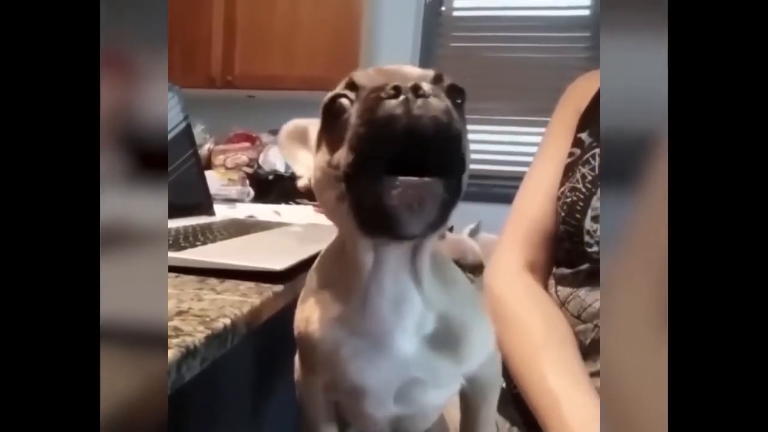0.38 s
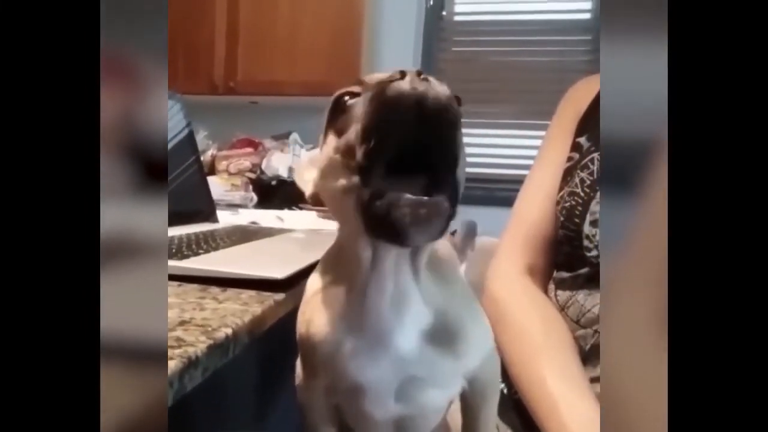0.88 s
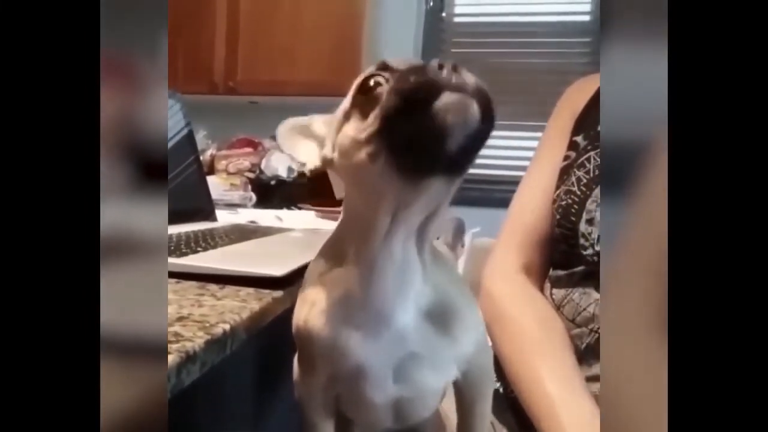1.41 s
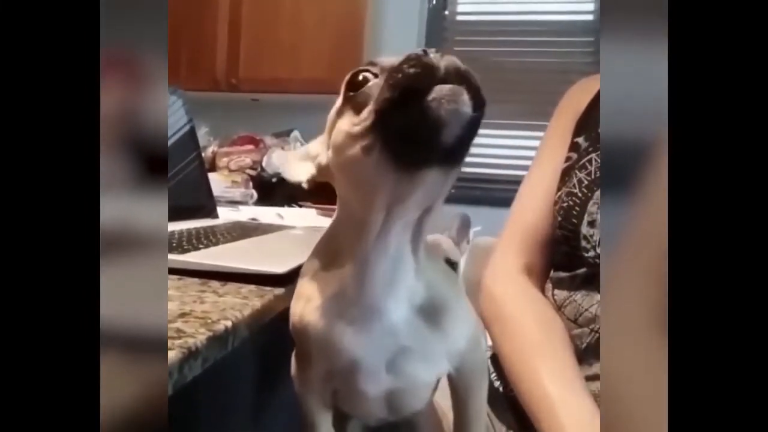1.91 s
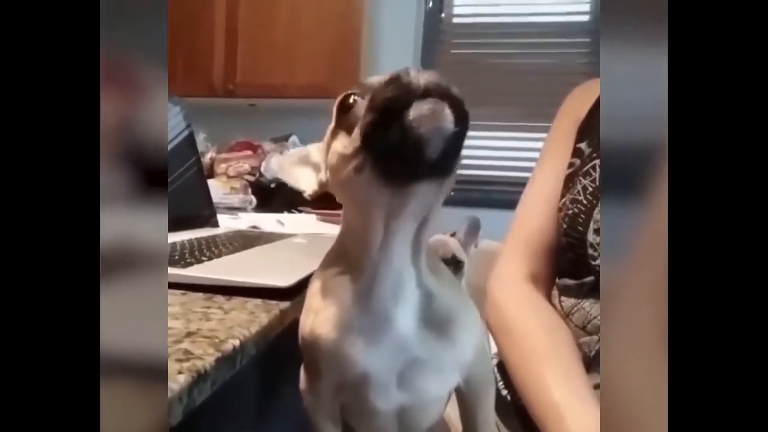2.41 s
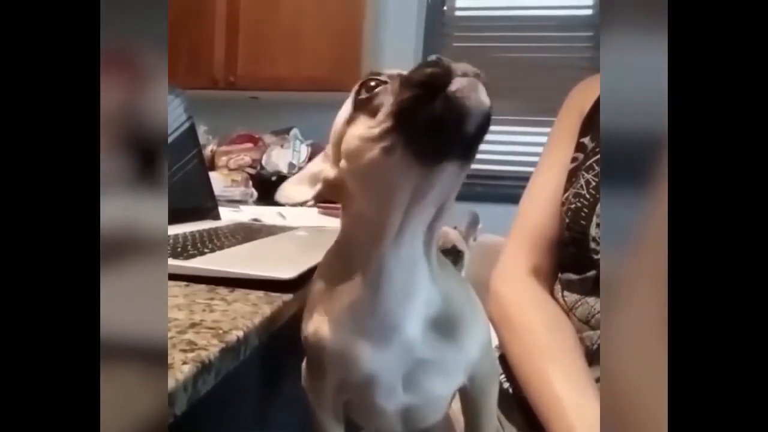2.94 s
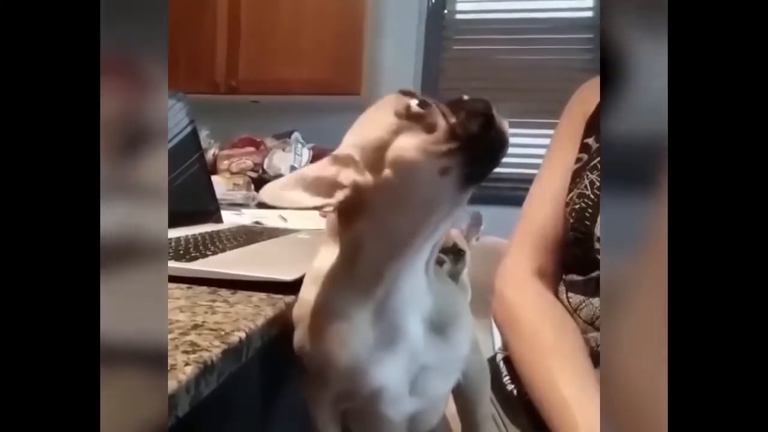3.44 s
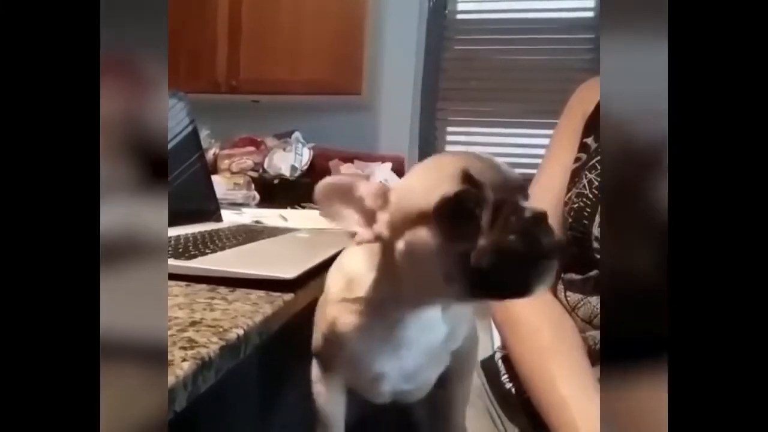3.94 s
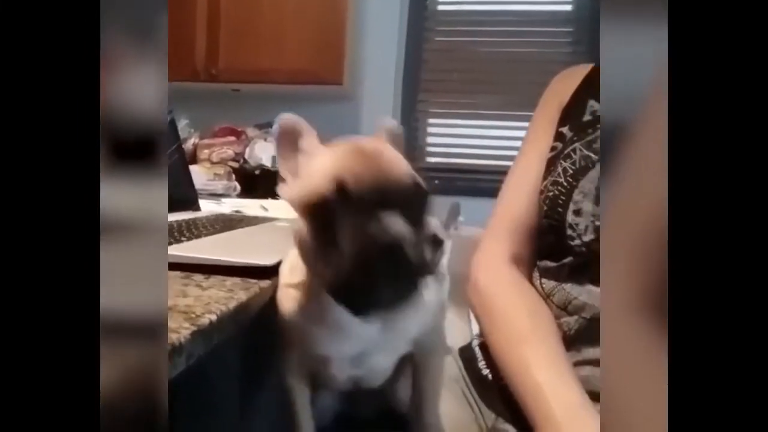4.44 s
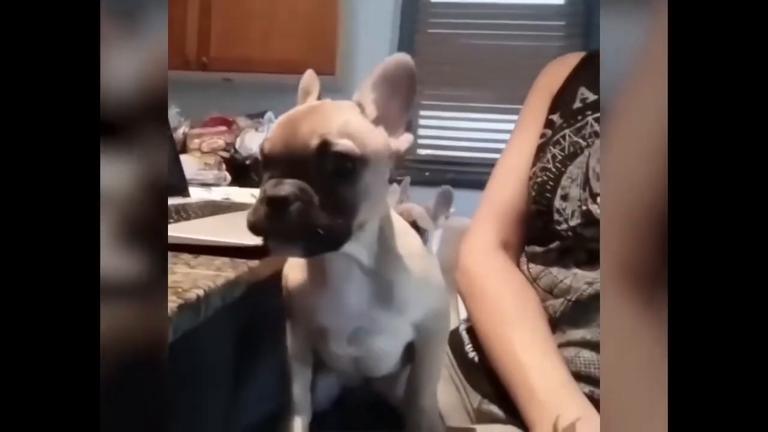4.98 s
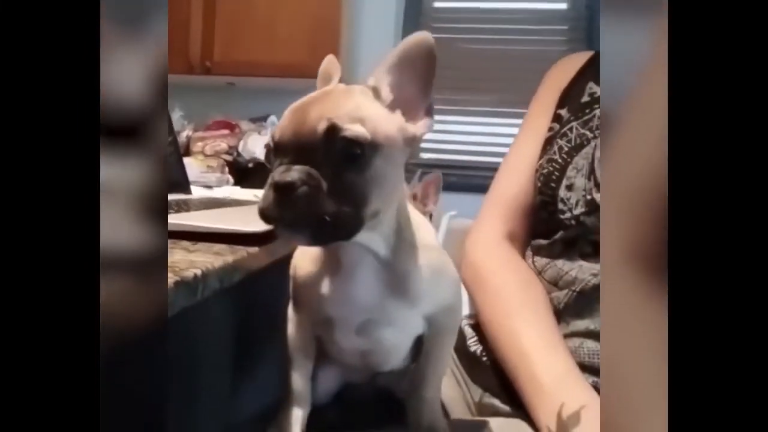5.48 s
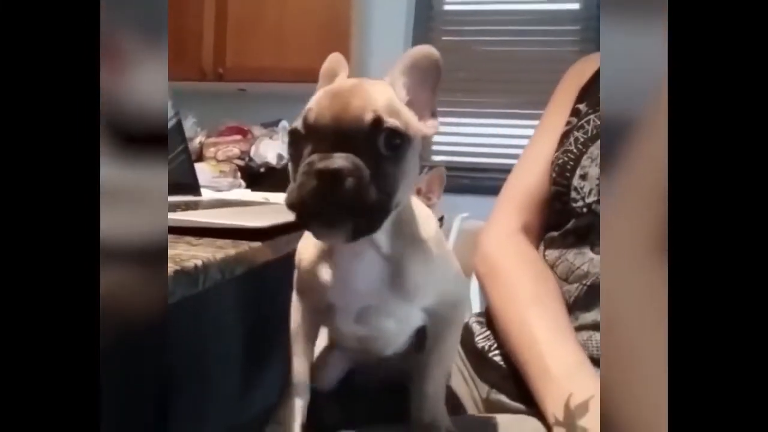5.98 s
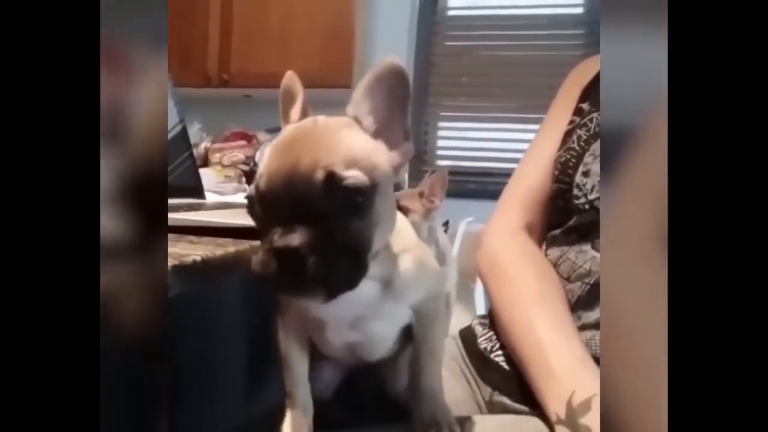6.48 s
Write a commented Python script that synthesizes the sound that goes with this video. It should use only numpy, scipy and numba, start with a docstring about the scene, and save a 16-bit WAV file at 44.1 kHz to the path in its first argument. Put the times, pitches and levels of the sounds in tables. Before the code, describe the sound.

Close, nearly centred puppy voice in a small hard-walled room with short reflections. High clear howls flip into raspy, broken yaps and drop back to rounder, pursed notes. The calls come in separate breaths with brief pauses, loudest at the start, shorter and weaker later. After a final yelp only dull room rumble remains, until a weak whimper at the end.

```python
"""In a kitchen, a puppy howls close to a phone: clear held howls, hoarse yaps and whines.
Its vocal folds pulse evenly in the clear notes and break into irregular beating in the hoarse ones.
Pulses and breath ring in throat, mouth, lips and snout, whose pitches move, and in small fixed high cavities.
The kitchen walls answer the voice; a low room rumble and a faint microphone hiss lie underneath."""
import sys
import numpy as np
from scipy import signal
from scipy.fft import rfft, irfft, next_fast_len
from scipy.io import wavfile
from scipy.ndimage import uniform_filter1d, minimum_filter1d
from numba import njit

SR = 44100
rng = np.random.default_rng(int(sys.argv[2]) if len(sys.argv) > 2 else 0)


def linear_from_db(decibels):
    """Turn decibels (scalar or array-like) into linear amplitude factors; 0 gives 1."""
    return 10 ** (np.asarray(decibels, float) / 20)


def wav_record(signal):
    """Record a signal, one row per channel, as 16-bit PCM in the file named by sys.argv[1]."""
    frames = np.transpose(np.atleast_2d(signal))
    bounded = np.clip(frames, -1, 1)
    # unit amplitude maps onto the largest positive 16-bit level
    quanta = np.round(bounded * 32767).astype(np.int16)
    wavfile.write(sys.argv[1], SR, quanta)


N = 291942


def in_time(rows):
    """Columns of a table joined by straight lines, one value a sample."""
    s, *columns = np.transpose(rows)
    return [np.interp(np.arange(N) / SR, s, c) for c in columns]


def stretches(rows, rest):
    """A value that holds from start to end of each stretch and rests between."""
    out = np.full(N, 1. * rest)
    for start_s, end_s, value in rows:
        out[int(start_s * SR):int(end_s * SR)] = value
    return out


def smooth(x, seconds):
    """Running mean, so that steps become short slopes."""
    return uniform_filter1d(x, int(seconds * SR), mode="nearest")


def waver(per_s):
    """Smooth chance with about per_s new values a second."""
    return np.interp(np.arange(N) / SR * per_s, np.arange(400), rng.standard_normal(400))


def cut(x, hz, kind, order=4):
    """Butterworth filter: keeps the named side of hz, or the band between two."""
    return signal.sosfilt(signal.butter(order, hz, kind, fs=SR, output="sos"), x)


def evened(x, seconds=0.042):
    """Running level brought to 1."""
    return x / np.sqrt(uniform_filter1d(x ** 2, int(seconds * SR)) + 1e-12)


@njit
def resonate(x, hz, width_hz, sr):
    """Two-pole resonance whose centre and width may move."""
    y = np.zeros(len(x))
    for i in range(2, len(x)):
        r = np.exp(-np.pi * width_hz[i] / sr)
        y[i] = (1 - r) * x[i] + 2 * r * np.cos(2 * np.pi * hz[i] / sr) * y[i - 1] - r * r * y[i - 2]
    return y


def ringing(x, hz, width_hz):
    """One narrow and two wider passes through a resonance leave dark valleys beside it."""
    width_hz = width_hz * np.ones(N)
    for widening in (1, 2, 3):
        x = resonate(x, hz, widening * width_hz, SR)
    return x


# stretches where the vocal folds beat unevenly: start_s, end_s, roughness (0-1)
HOARSE_STRETCHES = [(0, .22, .02), (.35, .615, .013), (.615, .8, .8), (1.1, 1.145, .1), (1.145, 1.22, .35),
                    (1.22, 1.31, .08), (1.31, 1.43, .33), (1.43, 1.535, .15), (1.535, 1.68, .35),
                    (1.68, 1.8, .05), (1.895, 2.075, .75), (2.47, 2.55, .8), (2.78, 2.91, .6),
                    (2.91, 3.085, .1), (3.085, 3.15, .2), (3.15, 3.24, .45), (3.24, 3.32, .07),
                    (3.32, 3.65, .025), (3.65, 3.7, .3), (3.88, 4.03, .22), (4.03, 4.15, .08),
                    (4.14, 4.205, .6), (4.205, 4.23, .2), (4.23, 4.375, .14), (4.375, 4.47, .07),
                    (4.47, 4.56, .5), (4.74, 4.83, .16), (4.83, 4.92, .6), (4.92, 5.07, .1),
                    (5.07, 5.15, .18), (6.26, 6.417, .8), (6.417, 6.61, .025), (6.61, 6.62, .4)]
CLEAR_ROUGHNESS = 0.004   # in all other places


def roughness():
    """The folds slip in and out of hoarse beating within a short time."""
    return np.clip(smooth(stretches(HOARSE_STRETCHES, CLEAR_ROUGHNESS), 0.018), 0, 1)


def fold_partials(pitch_hz, turns, rough):
    """The tonal part of the fold pulses: up to 43 partials, fading out towards 15500 Hz."""
    sink_db_per_khz = 60 * (rough - CLEAR_ROUGHNESS)   # uneven folds lose their high overtones
    sink_from_khz, sink_most_db = 1.9, 14
    waver_db = 6.0   # reached at the tenth partial
    # the closure is not one sharp click: partials above the sixth are scattered in phase
    scatter = rng.uniform(0, 2 * np.pi, 44) * (np.arange(44) > 6)
    total = np.zeros(N)
    for k in range(1, 44):
        sink_db = np.clip(sink_db_per_khz * (k * pitch_hz / 1000 - sink_from_khz), 0, sink_most_db)
        fade = np.clip(15500 / pitch_hz - k, 0, 1)
        wavering = 1 + np.log(10) / 20 * waver_db * min(k / 10, 1) * waver(14)
        total += linear_from_db(-sink_db) * np.cos(2 * np.pi * k * turns - scatter[k]) * fade * wavering
    return total / np.sqrt(15500 / pitch_hz / 2)   # fewer partials fit under 15500 Hz at a high pitch


def breath_air(turns):
    """Turbulent air through the folds, brighter than the pulses, puffing once a cycle."""
    air = rng.standard_normal(N)
    air = air + 2.0 * cut(air, 2400, "high", order=2)
    return air * (1 + .9 * np.cos(2 * np.pi * turns)) / 1.2


# vocal fold pitch, one list per breath; steep steps are register jumps: start_s, pitch_hz
FOLD_PITCH = [
    [(0.0, 340.8), (0.076, 356.2), (0.22, 392.7), (0.35, 396.9), (0.436, 414.5), (0.52, 444.7),
     (0.62, 414.3)],
    [(1.11, 339.7), (1.16, 629), (1.2, 517.4), (1.222, 404.6), (1.27, 383.1), (1.3, 444.4), (1.32, 565.3),
     (1.42, 545.8), (1.447, 452.3), (1.465, 565.4), (1.515, 546.4), (1.535, 621.4), (1.66, 550),
     (1.705, 442.1), (1.739, 407.6), (1.809, 407.9), (1.89, 464.9), (2.08, 431.4), (2.2, 441.9),
     (2.344, 420.4), (2.5, 381.9)],
    [(2.8, 414.9), (2.882, 584), (2.912, 614.9), (2.968, 561.9), (2.974, 282.2), (3.08, 450.2),
     (3.088, 718.1), (3.11, 859), (3.172, 692.7), (3.212, 515), (3.25, 408.8), (3.3, 380.5), (3.402, 422.2),
     (3.68, 311.7)],
    [(3.9, 469.4), (3.935, 527.1), (3.97, 654), (4.012, 641.1), (4.02, 483.3), (4.05, 443.4), (4.09, 472.4),
     (4.14, 470.6), (4.2, 756), (4.25, 740), (4.3, 630.8), (4.35, 661.5), (4.375, 472), (4.41, 397.7),
     (4.5, 377.6)],
    [(4.755, 416), (4.795, 485), (4.812, 608.3), (4.86, 597.3), (4.89, 531.3), (4.925, 411.6),
     (5.05, 430.3), (5.09, 582)],
    [(6.415, 469.8), (6.433, 492), (6.535, 515.5), (6.567, 476), (6.6, 462.3), (6.62, 512.6)],
]
# every second pulse is weaker: start_s, end_s, weakening (0-1)
WEAK_SECOND_PULSES = [(3.09, 3.17, 0.2), (3.9, 4.015, 0.6), (4.09, 4.29, 0.53), (4.29, 4.37, 0.24)]


def vocal_folds():
    """Pulses with breath, and their first partial; rough folds vary length and strength by the cycle."""
    jitter, flutter = 0.25, 0.003   # pitch changes by the cycle (times roughness) and slowly, as fractions
    still_breath, hoarse_breath = 0.011, 0.42
    rough = roughness()
    pitch_hz, = in_time(np.vstack(FOLD_PITCH))
    pitch_hz = pitch_hz * (1 + flutter * waver(35))
    weakening = stretches(WEAK_SECOND_PULSES, 0)
    chance = np.clip(rng.standard_normal((6000, 2)), -2, 2)   # per cycle: length, strength
    wobble = chance[np.cumsum(pitch_hz / SR).astype(int), 0]
    turns = np.cumsum(pitch_hz * np.exp(jitter * rough * wobble) / SR)
    cycle = (turns + .5).astype(int)   # strength changes between two pulses
    strength = linear_from_db(3.5 * rough * chance[cycle, 1]) * (1 - weakening * (cycle % 2))
    breath = (still_breath + hoarse_breath * np.sqrt(rough)) * breath_air(turns)
    pulses = strength * (fold_partials(pitch_hz, turns, rough) + breath)
    first_partial = uniform_filter1d(strength ** 2.5, 40) * np.cos(2 * np.pi * turns)
    return pulses, first_partial


# fixed resonances of the highest treble: pitch_hz, width_hz, level_db (against each other)
HIGH_CAVITIES = [(8340, 930, 11.5), (12300, 2400, 9)]


def high_cavities(x):
    """Small fixed cavities ring in parallel, signs alternating."""
    slope = np.diff(x, prepend=0)
    total = np.zeros(N)
    for k, (hz, width_hz, db) in enumerate(HIGH_CAVITIES):
        total += (-1) ** k * linear_from_db(db) * resonate(slope, np.full(N, 1. * hz), np.full(N, 1. * width_hz), SR)
    return total


# head raised and muzzle pursed for a howl: start_s, end_s, jaw_opening (0-1)
PURSED_MUZZLE = [(0, .62, 0.96), (1.66, 2.55, 0.22), (3.29, 3.75, 0.4)]
PURSING_S = 0.051


def jaw_opening():
    """The jaws stand fully open (1) except where the muzzle is pursed."""
    return smooth(stretches(PURSED_MUZZLE, 1.0), PURSING_S)


def snout_ring(pulses, snout_hz, jaws):
    """The snout rings, narrower when pursed; a side cavity above it is stronger with open jaws."""
    snout = evened(ringing(pulses, snout_hz, 380 * np.sqrt(jaws)))
    side_cavity = evened(ringing(pulses, snout_hz + 700, 520))
    return snout + 0.63 * jaws ** 2.0 * side_cavity


def throbbing(rough):
    """Strained yaps come in lumps; a full rasp is even."""
    throb_db, throbs_per_s = 7.0, 58
    depth_db = throb_db * np.sqrt(rough) * np.clip(1.5 - 2 * rough, 0, 1)
    return linear_from_db(depth_db * np.clip(waver(throbs_per_s), -2, 1))


# throat and mouth, one list per run of yaps or howl: start_s, throat_db, throat_hz, mouth_db
THROAT_AND_MOUTH = [
    [(0.0, -24, 770, -25.5), (0.078, -16.5, 780, -27.5), (0.122, -16.5, 760, -13), (0.214, -42.5, 910, -19),
     (0.548, -35.5, 850, -10), (0.608, -26, 792, -24.5), (0.744, -43.5, 773, -36.5), (0.77, -59, 830, -48)],
    [(1.115, -32, 930, -25), (1.133, -37, 1010, -20.5), (1.231, -46, 878, -23.5), (1.283, -47, 950, -54.5),
     (1.305, -27, 990, -26.5), (1.319, -32.5, 933, -13.5), (1.419, -39.5, 900, -20),
     (1.441, -48, 1010, -42.5), (1.471, -38.5, 625, -41.5), (1.521, -45, 855, -52), (1.547, -25, 970, -25),
     (1.587, -36.5, 1000, -11), (1.669, -32.5, 920, -21), (1.689, -33, 980, -43), (1.723, -47, 1040, -25.5),
     (1.785, -52, 990, -45)],
    [(1.785, -57, 780, -57), (1.811, -30.5, 766, -34), (2.057, -31.5, 622, -32), (2.129, -42, 970, -34.5),
     (2.299, -23.5, 870, -33), (2.41, -25, 845, -50.5), (2.479, -33, 822, -39), (2.51, -62, 846, -63.5)],
    [(2.803, -31.5, 890, -42), (2.835, -16, 855, -24), (2.911, -34, 1110, -27), (2.937, -29, 780, -25),
     (2.977, -32.5, 585, -42), (3.127, -22, 940, -25.5), (3.191, -20, 1064, -26.5),
     (3.265, -35.5, 830, -36), (3.403, -26, 890, -29.5), (3.461, -32, 800, -29), (3.637, -31.5, 690, -42),
     (3.658, -36.5, 637, -51)],
    [(3.9, -57, 920, -62), (3.924, -21, 910, -24), (3.994, -39, 1080, -21.5), (4.094, -26.5, 842, -37.5),
     (4.208, -36.5, 945, -15), (4.276, -36.5, 800, -24), (4.342, -41, 766, -20.5), (4.378, -45, 980, -32.5),
     (4.44, -35.5, 756, -40), (4.47, -68, 835, -45)],
    [(4.757, -28.5, 860, -45), (4.803, -32.5, 920, -16.5), (4.825, -54, 1080, -35),
     (4.895, -42, 677, -42.5), (5.047, -53.5, 809, -51), (5.091, -43, 708, -73), (5.112, -99, 648, -71)],
    [(6.285, -51, 916, -80), (6.293, -48, 915, -52.5), (6.386, -91, 993, -85)],
    [(6.391, -53, 714, -42), (6.4, -56, 776, -64), (6.408, -50, 805, -40), (6.452, -42, 1070, -49.5),
     (6.62, -35, 1050, -32)],
]


def voice_gates():
    """Low and high gate: the upper resonances fade in and out more slowly than the low ones."""
    low_edge_s, high_edge_s = 0.007, 0.016
    sounding = np.zeros(N)
    for rows in THROAT_AND_MOUTH:
        first_s, last_s = rows[0][0], rows[-1][0]
        start = int((first_s + low_edge_s / 2) * SR) if first_s > 0 else 0
        sounding[start:int((last_s + low_edge_s) * SR)] = 1
    low_gate = smooth(sounding, low_edge_s)
    return low_gate, low_gate * smooth(sounding, high_edge_s) ** 2


# levels of the upper resonances: start_s, lips_db, snout_db, treble_db
UPPER_LEVELS = [
    [(0.0, -43, -41, -31), (0.142, -22, -22, -23), (0.352, -23, -24.5, -21.5), (0.388, -19.5, -37.5, -18),
     (0.546, -32.5, -46, -24), (0.758, -71, -84.5, -62)],
    [(1.118, -38.5, -51, -38.5), (1.169, -30, -38.5, -30.5), (1.27, -55.5, -56, -44),
     (1.305, -32.5, -53.5, -27), (1.379, -20.5, -30.5, -28.5), (1.483, -52, -66.5, -51.5),
     (1.545, -51.5, -51.5, -33), (1.743, -60, -68.5, -50), (1.995, -50, -44, -49.5),
     (2.13, -60.5, -55.5, -51), (2.407, -63, -65, -57), (2.51, -85.5, -80.5, -82)],
    [(2.803, -51.5, -77, -42), (2.815, -34.5, -74.5, -47), (2.863, -33, -25.5, -30),
     (3.03, -55, -58, -46.5), (3.095, -33, -31, -29.5), (3.165, -34, -23.5, -26.5),
     (3.299, -53.5, -54, -48), (3.369, -23.5, -43.5, -44), (3.68, -96.5, -69, -60.5)],
    [(3.9, -61, -67, -65), (3.922, -32, -42, -57), (3.958, -44, -32.5, -34.5), (4.112, -40.5, -45.5, -46.5),
     (4.186, -31, -26.5, -23.5), (4.324, -32, -28, -31), (4.52, -83, -74, -70)],
    [(4.757, -41.5, -49, -52), (4.79, -40.5, -43, -28), (5.071, -55.5, -84, -95), (5.13, -62, -66, -54)],
    [(6.285, -82, -71, -84), (6.423, -53, -68.5, -57), (6.491, -45.5, -55, -54.5),
     (6.62, -39, -51.5, -45.5)],
]
# posture of head and muzzle: start_s, chest_db (at most), mouth_hz, snout_hz, shrill_hz
POSES = [(0, -29.5, 1195, 4420, 7180), (.3, -34.5, 1415, 4344, 7430), (.6, -39.5, 1406, 4950, 7870),
         (.65, -56, 1550, 4730, 7830), (1.14, -45, 1418, 3970, 7900), (1.4, -48, 1512, 4750, 7900),
         (1.55, -38.5, 1470, 4185, 7330), (1.65, -50, 1281, 3024, 5900), (1.71, -51.5, 1330, 3524, 7360),
         (1.88, -35.5, 1510, 3560, 6980), (1.91, -53, 1295, 2500, 7030), (2.1, -39, 1422, 2630, 6930),
         (2.5, -49, 1216, 3730, 7050), (2.86, -38, 1275, 3850, 6650), (3.05, -42, 1473, 2770, 6670),
         (3.13, -24.5, 1335, 3054, 5750), (3.22, -38.5, 1324, 3150, 7400), (3.39, -39.5, 1487, 3160, 6200),
         (3.48, -40, 1437, 3576, 7280), (3.68, -44, 1230, 3250, 7400), (3.92, -35.5, 1175, 2720, 8160),
         (3.95, -38, 1340, 3210, 8000), (4.01, -55, 1477, 3370, 7970), (4.05, -48.5, 1350, 2400, 7700),
         (4.14, -37, 1130, 2380, 8000), (4.18, -33.5, 1100, 3110, 7870), (4.25, -41.5, 1256, 3630, 8170),
         (4.36, -38.5, 1063, 2680, 7870), (4.43, -40.5, 1480, 3100, 7250), (4.76, -38.5, 1180, 4500, 7800),
         (4.83, -48.5, 1173, 4600, 8030), (4.95, -49, 1400, 4200, 7500), (5.09, -45, 1610, 3790, 6920),
         (6.3, -60, 1140, 3800, 6600), (6.46, -33, 1363, 4050, 6400)]
# lip resonance: start_s, pitch_hz
LIP_PITCH = [(1.3, 1970), (1.37, 2230), (1.44, 1970), (1.85, 1750), (2.1, 2100), (4.04, 2140), (4.8, 2256),
             (4.9, 1790)]
# level change of the highest treble in two stretches: start_s, end_s, change_db
TOP_TREBLE = [(.4, .8, -10), (3.85, 4.6, 4.5)]


def puppy():
    """Fold pulses ring in throat, mouth, lips, snout and small high cavities, each at its own level."""
    pulses, first_partial = vocal_folds()
    rough, jaws = roughness(), jaw_opening()
    throat_db, throat_hz, mouth_db = in_time(np.vstack(THROAT_AND_MOUTH))
    lips_db, snout_db, treble_db = in_time(np.vstack(UPPER_LEVELS))
    chest_db, mouth_hz, snout_hz, shrill_hz = in_time(POSES)
    lips_hz, = in_time(LIP_PITCH)

    # the chest tone fades when the voice fades
    chest_db = np.minimum(chest_db, np.maximum(throat_db, mouth_db) + 2.5)
    above_middle_db = treble_db + 40
    shrill_db = -43 + 0.94 * above_middle_db
    top_treble_db = uniform_filter1d(stretches(TOP_TREBLE, 0), int(PURSING_S * SR))
    air_db = -45 + top_treble_db + above_middle_db

    hoarse = 1 + .4 * rough   # folds that close badly damp the lower resonances
    chest = cut(first_partial, [130, 1100], "band", order=3)
    throat = cut(ringing(pulses, throat_hz, 136 * hoarse), 460, "high")
    mouth = -cut(ringing(pulses, mouth_hz, 258 * hoarse), 660, "high")
    lips = cut(ringing(pulses, lips_hz, 280 + 1400 * rough), [1500, 3100], "band")
    snout = -cut(snout_ring(pulses, snout_hz, jaws), [2300, 6200], "band")
    shrill = cut(ringing(pulses, shrill_hz, 940 * jaws ** 0.84), 2700, "high")
    air = -cut(high_cavities(pulses), 7400, "high", order=6)

    low = linear_from_db(chest_db) * evened(chest) + linear_from_db(throat_db) * evened(throat) + linear_from_db(mouth_db) * evened(mouth)
    middle = linear_from_db(lips_db) * evened(lips) + linear_from_db(snout_db) * evened(snout)
    high = linear_from_db(shrill_db) * evened(shrill) + linear_from_db(air_db) * evened(air)
    low_gate, high_gate = voice_gates()
    throb = throbbing(rough)
    return throb * (low_gate * low + high_gate * middle) + np.sqrt(throb) * high_gate * high


def kitchen(x):
    """Wall echoes: ten feedback delays a side, duller on every round."""
    t60_s, wall_cut_hz = 0.58, 15000   # time to fall 60 dB, before the dulling
    size = next_fast_len(N + SR)
    w = 2 * np.pi * np.fft.rfftfreq(size)
    dull = 1 / np.sqrt(1 + (w * SR / (2 * np.pi * wall_cut_hz)) ** 2)
    spectrum = rfft(x, size)
    out = np.zeros((2, N))
    lags = rng.uniform(0.013, 0.028, (2, 10)) * SR   # samples
    for side in range(2):
        echoes = 0
        for k, lag in enumerate(lags[side]):
            one_round = linear_from_db(-60 * lag / SR / t60_s) * dull ** .5 * np.exp(-1j * w * int(lag))
            echoes = echoes + (-1) ** k * one_round / (1 - one_round)   # all rounds summed
        out[side] = irfft(spectrum * echoes, size)[:N]
    return out


def room_sound(dog):
    """The kitchen's answer to the voice; hard tiles return more treble."""
    first, second = kitchen(dog + linear_from_db(-7) * cut(dog, 1200, "high", order=2))
    # the two microphone ports lie close together: only the upper room sound differs between them
    return first + 0.4 * cut(second, 2500, "high", order=1) * np.array([[1], [-1]])


# colour of the rumble: pitch_hz, level_db (per Hz, only against each other)
RUMBLE_COLOUR = [(15, -38.5), (25, -13.5), (253, -10.5), (305, -18.5), (391, -15), (434, -18.5),
                 (3500, -66.5), (4550, -100)]
# loudness of the rumble around which it wavers: start_s, level_db
RUMBLE_LEVEL = [(2, -65), (5, -61.5)]


def rumble():
    """Low room noise, its level wavering, nearly alike at both microphone ports."""
    apart, waver_db = 0.08, 4.0
    hz = np.maximum(np.fft.rfftfreq(N, 1 / SR), 1)
    colour_hz, colour_db = np.transpose(RUMBLE_COLOUR)
    colour = linear_from_db(np.interp(np.log(hz), np.log(colour_hz), colour_db))
    mid, side = irfft(rfft(rng.standard_normal((2, N))) * colour, N)
    level = linear_from_db(in_time(RUMBLE_LEVEL)[0] + waver_db * waver(11.0)) / mid.std()
    return level * (mid + apart * side * np.array([[1], [-1]]))


def microphone_hiss():
    """Faint steady noise, softened above 2500 Hz."""
    return linear_from_db(-76) * cut(rng.standard_normal(N), 2500, "low", order=1)


def scene():
    """The puppy nearly centred, with its room sound, the rumble and a faint microphone hiss."""
    dog = puppy()
    nearly_centred = linear_from_db(np.array([[-.15], [.15]]))   # dB left, right
    return dog * nearly_centred + linear_from_db(-29.5) * room_sound(dog) + rumble() + microphone_hiss()


def suppress_deep(x):
    """Lowers the band below 200 Hz while the sound is loud."""
    loudness_db = 10 * np.log10(uniform_filter1d(x.mean(axis=0) ** 2, 1500) + 1e-12)
    reduction_db = .8 * np.clip(loudness_db + 34.0, 0, 30)
    return x - cut(x, 200, "low") * (1 - linear_from_db(-reduction_db))


def limit(x):
    """Turns the level down smoothly around peaks above 0.7."""
    gain = np.minimum(.7 / (abs(x).max(axis=0) + 1e-9), 1)
    return x * uniform_filter1d(minimum_filter1d(gain, 400), 400)


def roll_off(x):
    """The treble ends steeply here."""
    return signal.sosfilt(signal.butter(12, 15990, fs=SR, output="sos"), x)


def record(dry):
    """A suppressor lowers the deep band, a limiter holds peaks and the top is cut steeply."""
    limited = limit(suppress_deep(dry))
    top_cut = signal.cheby2(12, 50, 14450, fs=SR, output="sos")   # 50 dB down from 14450 Hz
    below_top = signal.sosfilt(top_cut, limited)
    return roll_off(below_top)


dry = scene()
out = record(dry)
wav_record(out)
```